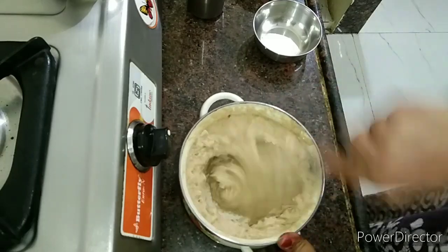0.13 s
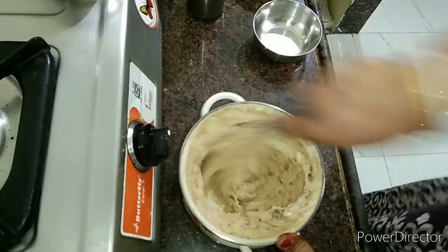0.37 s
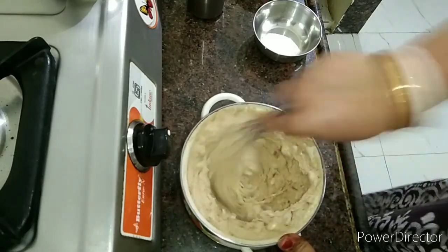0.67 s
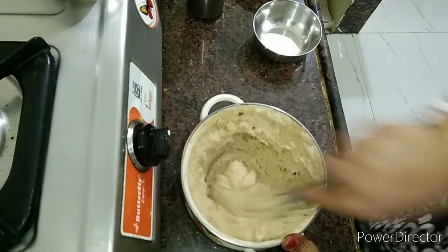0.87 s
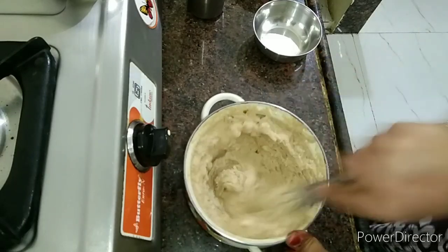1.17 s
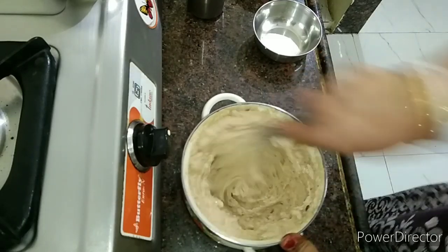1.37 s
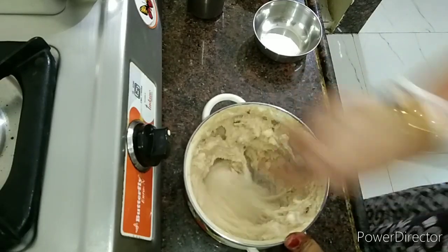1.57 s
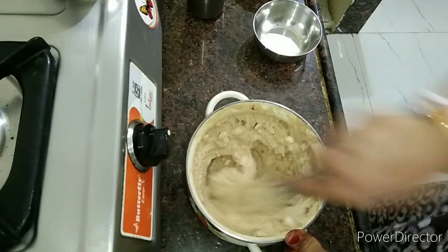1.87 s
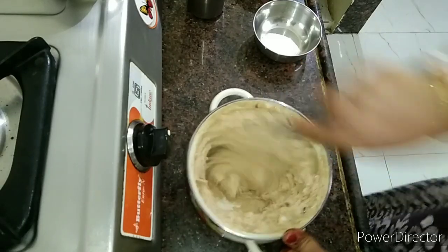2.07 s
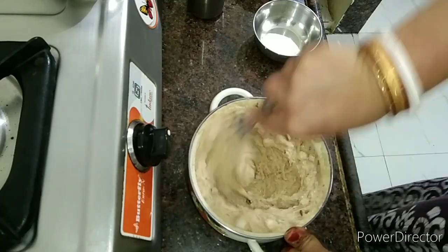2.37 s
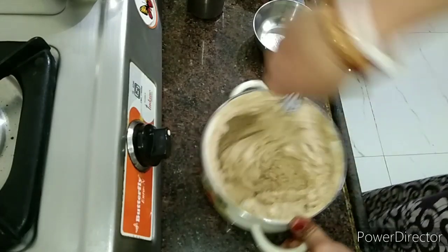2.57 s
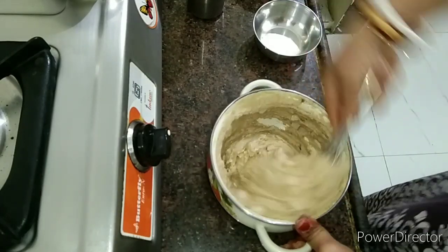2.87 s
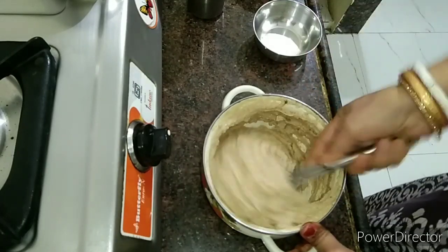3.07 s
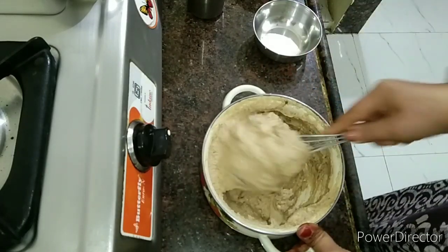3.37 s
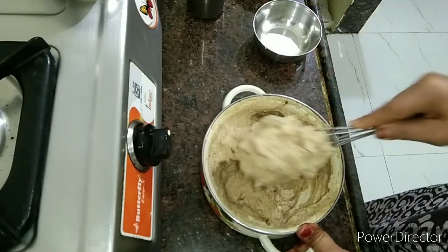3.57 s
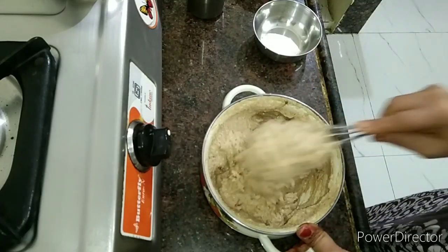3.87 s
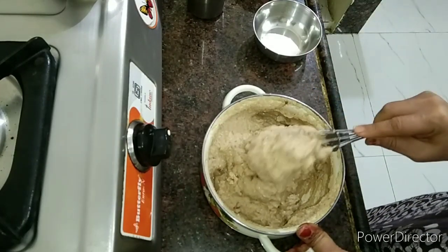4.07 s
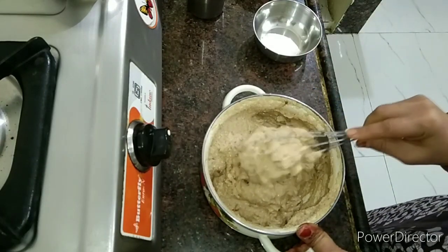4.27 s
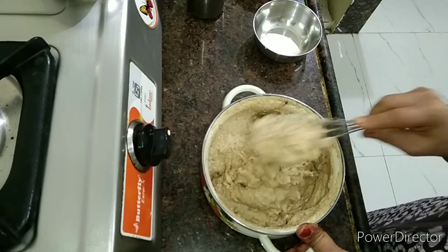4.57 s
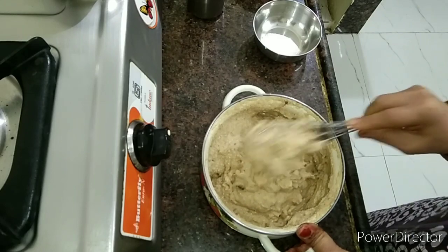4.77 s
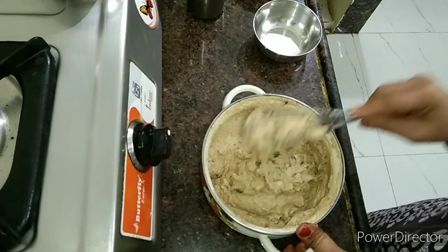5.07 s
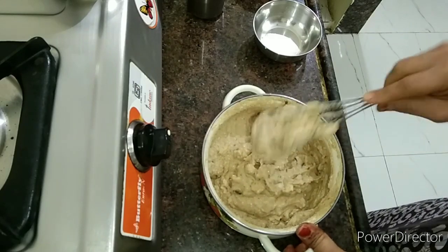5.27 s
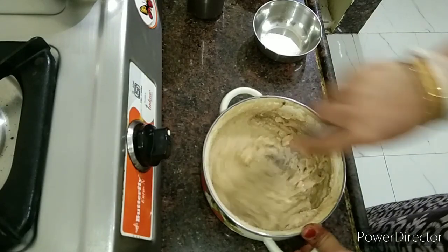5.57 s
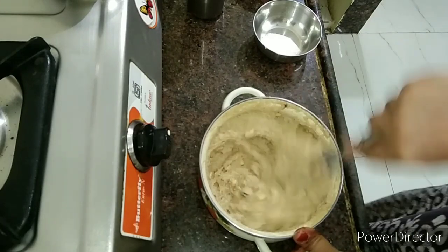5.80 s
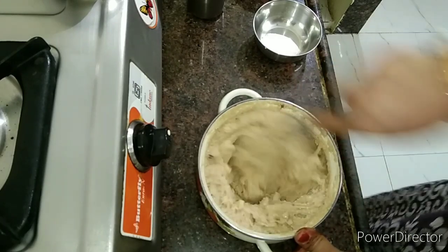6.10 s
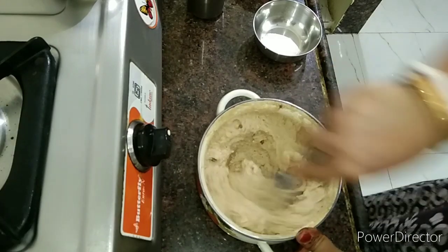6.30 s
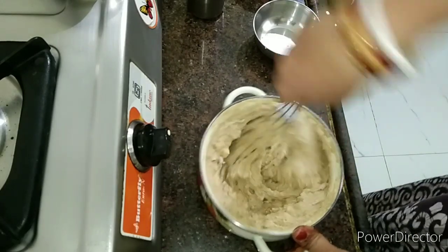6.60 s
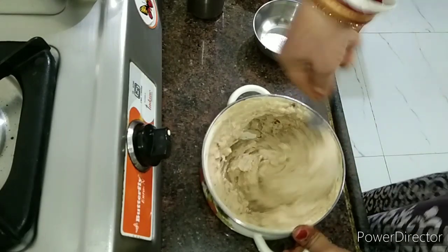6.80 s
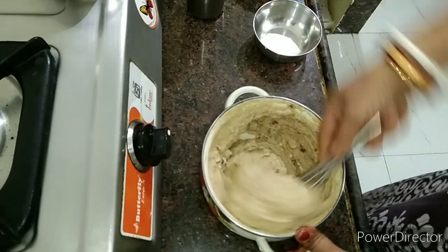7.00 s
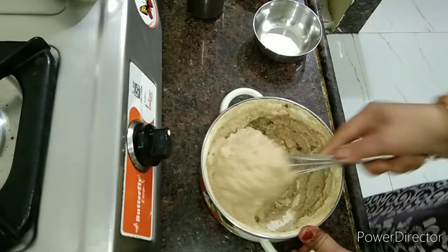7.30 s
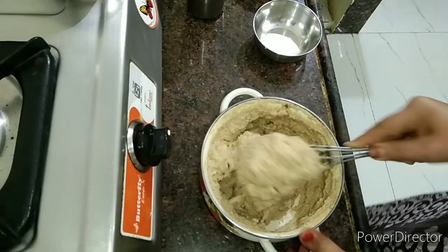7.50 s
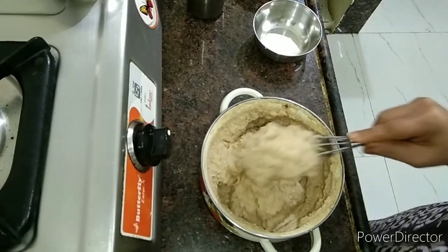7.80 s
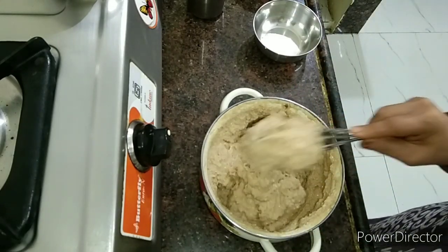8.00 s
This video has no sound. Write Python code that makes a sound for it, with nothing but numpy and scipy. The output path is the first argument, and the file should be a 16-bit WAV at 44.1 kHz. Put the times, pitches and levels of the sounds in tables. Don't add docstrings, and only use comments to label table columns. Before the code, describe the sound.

Rhythmic metallic whisk strokes clack about three times a second through sticky batter, stop, tap the rim, and resume more loosely in a hard-walled kitchen.

```python
import sys
import numpy as np
from scipy import signal
from scipy.fft import rfft, irfft
from scipy.io import wavfile
from scipy.ndimage import uniform_filter1d

SR = 44100
rng = np.random.default_rng(int(sys.argv[2]) if len(sys.argv) > 2 else 0)


def gain_from_db(level_db):
    decades = np.asarray(level_db, float) / 20
    return 10 ** decades


def store_wav(level_fs):
    pcm = np.round(np.clip(np.atleast_2d(level_fs), -1, 1) * 32767)
    wavfile.write(sys.argv[1], SR, pcm.T.astype(np.int16))


N = 359363

# start in seconds, peak in dB, ring in Hz, overtones in dB.
THUDS = [(0.046, -29, 440, -4.5), (0.365, -38.5, 440, -13), (0.372, -23.5, 440, -12),
         (0.397, -42.5, 400, -7.5), (0.418, -43.5, 385, -12), (0.453, -37.5, 403, -12),
         (0.708, -31.5, 450, -3.5), (0.718, -28, 465, -6), (0.825, -43, 350, -20), (0.852, -55, 370, -4),
         (0.806, -23.5, 390, -11), (1.054, -28.5, 472, -11), (1.298, -41.5, 449, 1), (1.376, -32, 508, -8),
         (1.471, -34.5, 410, 3.5), (1.696, -45, 413, -10), (1.717, -32, 324, -3.5),
         (2.042, -30.5, 487, -1.5), (2.093, -29.5, 430, -1), (2.127, -33.5, 386, -10.5),
         (2.524, -36, 325, -16), (2.734, -45, 293, 3), (2.923, -40.5, 292.5, -10), (2.931, -58, 292, -10),
         (3.02, -40.5, 400, 17), (1.092, -37, 382, -8), (4.609, -42.5, 483, -10), (4.8112, -37.5, 480, -10),
         (4.996, -47, 480, 2.5), (5.1615, -38.5, 485, -12), (4.847, -48.5, 320, -29),
         (5.034, -46, 311, -20), (4.65, -51.5, 308, -16), (5.2, -48, 310, -26.5), (6.068, -41.5, 400, -15),
         (1.993, -45.5, 444, -14.5), (2.164, -49.5, 380, -3), (3.215, -42, 440, 7), (4.611, -32, 270, -1.5),
         (4.812, -30.5, 274, 1), (4.996, -32.5, 270, -12), (5.162, -34.5, 256, -8.5),
         (5.377, -45.5, 281, -25), (5.985, -52.5, 304, -37.5), (6.082, -32.5, 399, -19.5),
         (6.468, -35, 486, -11.5), (6.831, -45, 388, -11), (6.996, -44.5, 935, -17),
         (0.862, -45, 400, -17.5)]
# start in seconds, peak in dB, treble in dB, low ring in dB, echo in dB.
BLOWS = [(0.1079, -11, -15, -10, -3), (0.1131, -7.5, -10, -10, -1.5), (0.438, -13.5, -13.5, -9, 9),
         (0.448, -9.5, -20, -8, -12), (0.4568, -16, -22, -33, -2), (0.7742, -17.5, -16, -3, -3),
         (0.7887, -14.5, -14.5, -4.5, -1.5), (1.1004, -11, -4.5, -5, -3), (1.4421, -16.5, -6, -4.5, -0.5),
         (1.459, -10.5, -18, -13, -4.5), (1.7823, -12.5, -10, -18.5, -0.5), (2.116, -11, -31, -7.5, -11),
         (2.1249, -10.5, -13.5, -6, 2), (2.4344, -17.5, -17, -10.5, -0.8),
         (2.4635, -17.5, -19.5, -8.5, 1.5), (4.6113, -11, -19.5, -10, 1), (4.8118, -6.5, -29, -13, -2),
         (4.9946, -22, -20, 2, -1), (5.1621, -12, -28.5, -11, 2), (6.1283, -5.5, -10, -9.5, 0.5),
         (6.5061, -6, -6.5, -4, -1), (6.517, -10.5, -9, -16, -7), (7.6544, -34, -19.5, 1.5, 4),
         (7.8007, -42.5, -21, 9, -1), (0.1135, -19, -12.5, -7, -3), (1.444, -19, -18, -8, 2),
         (0.7924, -17, -17, -1.5, -4.5), (0.797, -22, -17, -3.5, -4)]
RIM_TAPS_S = (4.5, 5.3)


def level(x, db):
    return x * gain_from_db(db) / np.sqrt(np.mean(x ** 2))


def on_log(hz, table):
    rows = np.array(table)
    return np.interp(np.log(np.maximum(hz, 1)), np.log(rows[:, 0]), rows[:, 1])


def band(x, lo_hz, hi_hz):
    edges_hz = [lo_hz, min(hi_hz, .48 * SR)]
    return signal.sosfilt(signal.butter(2, edges_hz, "bandpass", fs=SR, output="sos"), x)


def walk(rate_hz):
    hold = int(SR / rate_hz)
    steps = np.repeat(rng.standard_normal(N // hold + 1), hold)
    return 1.2 * uniform_filter1d(uniform_filter1d(steps, hold), hold)[:N]


def grains(rate_per_s, spread_db):
    hit = rng.random(N) < rate_per_s / SR
    return hit * rng.standard_normal(N) * gain_from_db(spread_db * np.minimum(rng.exponential(size=N), 4))


def causal(db):
    c = irfft(db * np.log(10) / 20)
    half = len(c) // 2
    return irfft(np.exp(rfft(np.r_[c[0], 2 * c[1:half], np.zeros(half)])))[:half]


def strike(out, s, db, hz, gain, t60, rise_s, lag_s, sag=0):
    sag_s = 0.0064
    length_s = min(.2, np.max(t60) + np.max(lag_s))
    t = np.maximum(np.arange(int(length_s * SR))[:, None] / SR - lag_s, 0)
    bent_t = t + sag * sag_s * (1 - np.exp(-t / sag_s))
    envelope = (1 - np.exp(-t / rise_s)) * 1000. ** (-t / t60)
    ring = (gain * np.sin(2 * np.pi * hz * bent_t) * envelope).sum(axis=1)
    start = int(s * SR)
    ring = ring[:N - start]
    out[start:start + len(ring)] += ring * gain_from_db(db) / np.abs(ring).max()


def with_swell(base_db, hits, after_db):
    rise_s, fall_s = 0.012, 0.056
    t = np.arange(N // 64 + 1) * 64 / SR
    late = np.maximum(t[:, None] - np.array([row[0] for row in hits]), 0)
    shape = (1 - np.exp(-late / rise_s)) * np.exp(-late / fall_s)
    peaks = gain_from_db(np.array([row[1] for row in hits]) + after_db)
    swell = np.interp(np.arange(N) / SR, t, shape @ peaks)
    return 10 * np.log10(gain_from_db(2 * base_db) + swell ** 2)


def fan():
    # time in seconds, overall level in dB.
    fan_level = [
        (0.0, -54),
        (1.11, -54),
        (1.52, -56),
        (1.86, -53),
        (4.2, -56),
        (4.74, -55),
        (5.1, -54),
        (7.72, -58),
        (7.88, -56),
        (8.15, -57),
    ]
    # multiple of the shaft rate, level in dB.
    orders = [(3, -5.5), (5, -6.5), (9, -29), (14, -26.5)]
    # frequency in Hz, air noise density in dB per Hz.
    air_spectrum = [(15, -30), (25, -14), (42, -30.5), (66, -14), (90, -10), (130, -10), (167, -14.5),
                    (251, -9), (275, -21.5), (379, -22), (945, -51.5), (1400, -46), (1800, -30.5),
                    (2340, -83.5), (3960, -120)]
    shaft_hz, bearing_hz, bearing_width_hz = 24.5, 2076, 230
    db = np.interp(np.arange(N) / SR, *np.transpose(fan_level))
    turn = 2 * np.pi * np.cumsum(shaft_hz * (1 + 0.006 * walk(3))) / SR
    tones = sum(np.sqrt(2) * gain_from_db(g_db + 0.5 * walk(8.0)) * np.sin(k * turn) for k, g_db in orders)
    air_db = on_log(np.fft.rfftfreq(N, 1 / SR), air_spectrum)
    air = irfft(rfft(rng.standard_normal(N)) * gain_from_db(air_db), N)
    hiss = band(rng.standard_normal(N), bearing_hz - bearing_width_hz / 2, bearing_hz + bearing_width_hz / 2)
    return gain_from_db(db) * (tones + level(air, -5.5) * gain_from_db(0.51 * walk(28.0)) + level(hiss, -14.5))


def kitchen(x):
    # band centre in Hz, t60 in seconds, level in dB.
    room_bands = [(162, 0.66, 12.5), (292, 0.71, 6), (607, 0.79, 4), (1383, 0.61, 7.5), (2220, 0.38, 5.5),
                  (3150, 0.16, -4.5), (4806, 0.56, 3), (7280, 0.56, 1), (10930, 0.48, 0), (16100, 0.48, -3)]
    band_ratio = 1.35
    t = np.arange(int(.9 * SR)) / SR
    clumps = np.repeat(rng.standard_normal(len(t) // 40 + 1), 40)[:len(t)]
    sparse = rng.standard_normal(len(t)) * gain_from_db(0.71 * np.exp(-t / 0.098) * clumps)
    tail = sum(gain_from_db(db) * band(sparse, hz / band_ratio, hz * band_ratio) * 1000. ** (-t / t60)
               for hz, t60, db in room_bands)
    tail = tail * np.clip((t - .003) / 0.0055, 0, 1)
    return signal.fftconvolve(x, tail / np.sqrt(len(t) * 0.058))[:N]


def pops(smack_db):
    # start in seconds, peak in dB, pitch in Hz.
    clear = [(0.108, -39.5, 1554), (0.799, -25, 3450), (0.716, -40, 3380), (2.512, -39, 3050),
             (2.542, -41, 1466), (2.923, -39.5, 749), (2.931, -41, 790), (2.043, -32, 3120),
             (2.043, -35.5, 1853), (2.27, -42.5, 1410), (2.268, -39, 3770), (5.518, -56, 3220),
             (5.519, -55.5, 2800), (5.745, -48.5, 5100), (5.766, -47, 4170), (6.774, -48, 1850),
             (6.996, -49, 2920), (7.006, -45, 3720), (2.693, -40, 3900), (2.694, -48, 3030),
             (2.595, -42, 3473), (7.253, -50, 5240), (0.716, -39, 1049), (0.738, -43, 1075),
             (0.805, -32.5, 2010), (6.553, -39, 1256), (6.57, -36, 2900), (6.773, -46, 1420),
             (6.908, -46.5, 1376), (6.947, -51, 3250), (6.955, -44, 3280), (6.963, -46, 3275),
             (1.717, -46, 1780), (6.87, -47.5, 4920), (6.91, -45, 5300), (7.105, -44, 1390),
             (3.557, -50, 5100), (3.79, -52, 5100), (4.3, -50, 6000), (3.888, -56, 4330),
             (3.423, -50, 11300), (3.48, -50, 9600), (3.663, -60, 10400), (4.478, -51.5, 10800),
             (0.801, -30, 2660), (0.802, -34, 4200)]
    out, faint = np.zeros(N), rng.random((400, 3))
    cycles = 26
    for s, db, hz in clear:
        strike(out, s, db, np.array([hz]), 1, cycles / hz, .001, 0)
    for when, pitch, size in faint:
        s, hz = when * (N - 2) / SR, 700 * 5.0 ** pitch
        db = smack_db[int(s * SR)] + 10.0 - 9 * size
        strike(out, s, db, np.array([hz]), 1, cycles / hz, .001, 0)
    return out


def drag(smack_db, scrape_db, grit_db, rumble_db):
    flicker_db = 1.8
    smack = level(band(grains(1800, 1.8), 504, 3300), 0) * gain_from_db(smack_db + flicker_db * walk(17))
    ticks = grains(4000, flicker_db)
    wires = band(band(ticks, 2300, 12000), 4730, 9000) + gain_from_db(-31.5) * band(ticks, 9000, 15500)
    scrape = level(wires, 0) * gain_from_db(scrape_db + flicker_db * walk(21))
    coarse = band(band(grains(440, 2.5), 2700, 9500), 2700, 9500)
    grit = level(coarse, -10.5) * gain_from_db(grit_db + 5.3 * walk(6.1))
    rumble = level(band(grains(900, 0.98), 200, 573), 0) * gain_from_db(rumble_db + flicker_db * walk(23))
    return gain_from_db(-4) * smack + gain_from_db(-8.5) * (scrape + grit) + gain_from_db(-4) * rumble


def sweeps():
    # start in seconds, level in dB.
    brushes = [
        (5.742, -60),
        (5.9, -63),
        (6.3, -59.5),
        (6.66, -60),
        (6.86, -55),
        (6.94, -57.5),
        (7.05, -77),
    ]
    # start in seconds, level in dB.
    drags = [
        (2.62, -64),
        (2.8, -75),
        (3.0, -66),
        (6.865, -57),
        (6.93, -57.5),
        (7.0, -77),
    ]
    brush = band(grains(9000, 1.1), 2600, 15000)
    rasp = level(band(grains(1500, 2.03), 4300, 5800), 0) * gain_from_db(with_swell(-120., drags, 0.) + 2.2 * walk(58))
    return level(brush, 0) * gain_from_db(with_swell(-120., brushes, 1.4) + 1.5 * walk(31)) + rasp


def thuds():
    # frequency in Hz, level in dB, t60 in seconds.
    pot_modes = [(270, 1.5, 0.43), (308, -2, 0.26), (370, 2.5, 0.28), (390, -1, 0.21), (434.7, 0, 0.17),
                 (509.6, 0, 0.39)]
    body_hz, body_db, body_t60 = np.transpose(pot_modes)
    pot_db, pot_db_per_octave = -9.5, 17
    t60, rim_sag = 0.045, 0.61
    out, chance = np.zeros(N), rng.random((50, 6))
    for (s, db, ring_hz, over_db), row in zip(THUDS, chance):
        hz = np.r_[ring_hz * np.array([1, .74, 1.3, 1.75]), 900 * 2.5 ** row]
        gain = gain_from_db(np.r_[0, -12, -10, over_db - 1.5, np.full(6, over_db - 5.)])
        on_rim = RIM_TAPS_S[0] < s < RIM_TAPS_S[1]
        strike(out, s, db, hz, gain, t60 * (400 / hz) ** 1.1, .0012, .0007 * (300 / hz) ** 1.39, rim_sag * on_rim)
        octaves_off = np.abs(np.log2(body_hz / ring_hz))
        near = gain_from_db(body_db - pot_db_per_octave * octaves_off + 2.6 * row)
        strike(out, s, db + pot_db, body_hz, near * np.sign(row[::-1] - .5), body_t60, .006, 0)
    return band(out, 100, 3100)


def contacts():
    # start in seconds, peak in dB, body in dB, low ring in dB, echo in dB.
    knocks = [(0.048, -29.5, 3.5, 3.5, 5), (0.3792, -28, 10, 16, -2), (0.718, -32, 3, -6, 5.5),
              (0.806, -20.5, -3.5, -1, -15.5), (1.0564, -24.5, 3, -7.5, 2.5),
              (1.125, -26, -14.5, -5.5, -2.5), (1.3704, -34, -12.5, 2, 4), (1.387, -25.5, -11.5, -4, 7),
              (1.7702, -27, 2.5, 1, 5), (2.0442, -30, -1.5, -1, 8.5), (2.693, -36.5, 17, 15, 0),
              (2.964, -31, -4, -22, 4), (3.22, -38, 1, -21, 6.5), (3.354, -42.5, 0, 10, -1),
              (5.519, -58.5, 8, 12, 1), (5.765, -41.5, 2, 6, 1.5), (5.809, -35, -6, -1.5, 4),
              (5.91, -34.5, -17, 4, -19.5), (6.089, -26, -5.5, 4.5, 4.5), (6.106, -36, -4, 18.5, 1),
              (6.111, -37.5, 3.5, -10, 10), (6.4694, -35, 14, -13, -8.5), (6.493, -25.5, -11, -9.5, -13.5),
              (7.109, -38, 16, 5, 3)]
    # start in seconds, peak in dB, treble in dB.
    wire_ticks = [(0.373, -30, -15), (0.393, -22.5, -28), (0.711, -33, -26), (0.73, -35, -9),
                  (0.7341, -26, -24), (0.764, -27, -25.5), (1.23, -28.5, -35), (1.3982, -46, 2),
                  (1.4013, -35.5, -27), (2.055, -33.5, -29), (2.06, -29.5, -22.5), (2.3511, -28.5, -25),
                  (2.412, -43, -33), (2.429, -34, -14), (3.157, -29, -29), (4.8058, -30, -12),
                  (5.742, -45.5, -16), (5.757, -40, -14), (5.782, -36, -24.5), (5.859, -34.5, -17.5),
                  (5.87, -48.5, -24), (5.903, -37, -17), (5.931, -36.5, -20.5), (5.965, -35, -17.5),
                  (5.993, -30.5, -18), (6.098, -27, -37), (6.3437, -34.5, -31), (6.871, -40, -5),
                  (7.371, -43, -19), (0.0574, -35, -13), (1.3044, -37, -25), (1.605, -35.5, -4),
                  (1.656, -43, -13), (1.908, -40.5, -10), (6.076, -33.5, -19), (7.3092, -52.5, -16.5),
                  (7.127, -51.5, -1), (7.276, -53, -4), (7.32, -54, -0.5), (3.426, -57, -12),
                  (3.485, -58, -14), (3.665, -54, -16), (4.478, -54, -12)]
    # start in seconds, peak in dB, treble in dB, low ring in dB.
    grazes = [(5.7615, -43, -8, -14), (5.787, -43, -19, -12), (5.803, -37, -10, 1.5), (5.822, -38, -20, -2),
              (5.828, -46, -10, -9), (5.841, -52, -2, -12), (5.849, -47.5, -1, -13), (5.8715, -42, -14, 0),
              (5.881, -45, -3.5, -5), (5.92, -36, -14.5, 0), (5.937, -47, -5.5, -10),
              (5.944, -49, -16.5, -12), (5.95, -47.5, -16.5, -6.5), (5.985, -51, 5, -16),
              (5.987, -39, -23, -12), (6.007, -37, -14, -9), (6.0095, -35, -17, 5), (6.04, -45, -18, -9),
              (6.052, -42, -6, -4), (0.1053, -17, -16, -6), (2.577, -33.5, -12, 4), (2.594, -33, -14, 3),
              (2.64, -51, -14, -10), (2.716, -41, -22, -11), (2.913, -37, -26, 6), (3.003, -47, -20, -14),
              (1.074, -34, -34, 8), (1.178, -35, -22, 0), (1.247, -39, -30, 8), (1.69, -35.5, -30, 9)]
    # start in seconds, peak in dB, low ring in dB.
    bangles = [(0.985, -36, -27), (7.756, -46, -31.5), (3.419, -43.5, -61), (3.479, -47, -14),
               (3.556, -48, -4), (3.5986, -49.5, -15), (3.661, -45.5, -3.5), (3.694, -42, -4),
               (3.7668, -57, -38), (3.79, -48.5, -29), (3.8647, -51, -14), (3.889, -54, 4.5),
               (4.015, -58, -34.5), (4.063, -43, -4), (4.108, -44.5, -22), (4.17, -48, -36),
               (4.476, -42, -52), (4.592, -46, -34), (5.5849, -41, -9.5), (5.705, -42.5, -28),
               (7.1849, -43.5, -4), (7.242, -41.5, 1.5), (7.399, -45, -19), (7.496, -45, -8),
               (5.598, -57, -8), (5.647, -53, -6), (5.668, -48, -30), (5.535, -49, -13), (4.755, -42, -30),
               (5.082, -42, -17), (1.355, -45, -20)]
    tick_low_db, tick_body_db, tick_echo_db = -7.5, -12, 0.5
    return ([(s, db, top, low, low - 11.5, echo) for s, db, top, low, echo in BLOWS]
            + [(s, db, -20, low, body, echo) for s, db, body, low, echo in knocks]
            + [(s, db, top, tick_low_db, tick_body_db, tick_echo_db) for s, db, top in wire_ticks]
            + [(s, db, top, low, tick_body_db + low, -2) for s, db, top, low in grazes]
            + [(s, db, -31, low, -15.5, 4.5) for s, db, low in bangles])


def clacks():
    # frequency in Hz, common colour in dB.
    clack_tone = [(300, -37), (600, -13.5), (1000, -10), (2000, -5.5), (2800, -4), (4100, -5), (5500, -6.5),
                  (7300, -0.5), (9000, -6), (11500, 0), (15000, -5.5)]
    # centre in Hz, width in Hz, level in dB.
    rim_rings = [(4250, 310, 4), (5810, 170, -1.5), (7440, 480, 1)]
    near, walls, chance = np.zeros(N + SR), np.zeros(N + SR), rng.standard_normal((160, 512))
    hz, t = np.fft.rfftfreq(512, 1 / SR), np.arange(512) / SR
    crack, chatter = 1000. ** (-t / .004), 1000. ** (-t / 0.042)
    rise = 1 - np.exp(-t / 0.00015)
    for (s, db, treble_db, low_db, body_db, echo_db), noise in zip(contacts(), chance):
        tilt = [(2000, body_db), (3100, 0.51 * body_db + 0.82 * low_db), (4100, low_db), (4900, low_db),
                (5700, 0.18 * low_db), (7000, 0.3), (9200, 7.0 + 0.49 * treble_db), (11500, treble_db)]
        tone_db = on_log(hz, clack_tone) + on_log(hz, tilt)
        uneven = np.repeat(noise[::-16], 9)[:len(hz)]
        click = causal(tone_db + 1.1 * uneven)
        on_rim = RIM_TAPS_S[0] < s < RIM_TAPS_S[1]
        fade = rise * (crack ** .65 if on_rim else crack + gain_from_db(-10.5) * chatter)
        rattle = np.convolve(noise * fade, causal(tone_db + (0 if on_rim else 2.2) * uneven))
        if on_rim:
            rattle = rattle + sum(gain_from_db(g_db) * band(rattle, f - w / 2, f + w / 2) for f, w, g_db in rim_rings)
        rattle = rattle * gain_from_db(db) / np.abs(rattle).max()
        start = int(s * SR)
        near[start:start + len(rattle)] += rattle
        same_energy = np.sqrt(np.sum(rattle ** 2) / np.sum(click ** 2))
        walls[start:start + len(click)] += click * gain_from_db(echo_db) * same_energy
    return near[:N], walls[:N]


def scene():
    # time in seconds, effort in dB.
    pull = [(0, 1.8), (0.95, 0), (1.82, 0.5), (2.34, -2.5), (2.63, -1.7), (2.79, -0.5), (3.12, -0.5),
            (3.43, -12.5), (3.9, -28), (4.54, -25), (4.68, -27), (5.2, -17.5), (5.45, -35), (5.79, -18),
            (6.28, -2), (7.08, -0.6), (7.5, -8), (7.62, -22), (8.15, -16)]
    # centre in Hz, width in Hz, level in dB.
    wire_rings = [(4460, 90, -5.5), (5730, 66, -1.5), (6920, 110, -1.5), (7900, 130, -6), (8850, 120, -10),
                  (5380, 100, -2.5), (6200, 50, -4), (6570, 60, -0.4), (7430, 65, 0), (7830, 200, -3.5)]
    effort = np.interp(np.arange(N) / SR, *np.transpose(pull))
    grit_db = -50.5 + 2.3 * effort
    smack_db = with_swell(-58 + effort, BLOWS, -45.5)
    scrape_db = with_swell(grit_db, BLOWS, -23)
    rumble_db = with_swell(-60 + 0.31 * effort, THUDS, -16)
    clack, clack_spread = clacks()
    thud, pop = thuds(), pops(smack_db)
    stir = drag(smack_db, scrape_db, grit_db, rumble_db) + sweeps()
    clack_spread = clack_spread + sum(gain_from_db(db) * band(clack_spread, hz - w / 2, hz + w / 2)
                                      for hz, w, db in wire_rings)
    room = kitchen(gain_from_db(3.5) * clack_spread + gain_from_db(-8.5) * thud + pop / 2 + gain_from_db(-1) * stir)
    return (clack + thud + pop + gain_from_db(4.5) * stir + room + fan())[None]


def roll_off(x):
    return signal.sosfilt(signal.butter(12, 16650, fs=SR, output="sos"), x)


def record(dry):
    # frequency in Hz, suppressor threshold in dB.
    mute = [(100, -110), (600, -99.5), (900, -87.5), (1300, -85.5), (1700, -88), (2100, -88), (2800, -91),
            (5000, -81), (9000, -85), (12500, -87.5), (15000, -99)]
    dip_hz, dip_width_hz, share = 2720, 450, 0.5
    port = dry[0] - share * signal.lfilter(*signal.iirpeak(dip_hz, dip_hz / dip_width_hz, SR), dry[0])
    heard = port + level(band(rng.standard_normal(N), 2000, 9000), -79.5)
    hz, _, z = signal.stft(heard, SR, nperseg=512)
    power = uniform_filter1d(np.abs(z) ** 2, size=3, axis=0) + 1e-18
    hold = .8
    power = signal.lfilter([1 - hold], [1, -hold], power, axis=1)
    pairs = np.repeat(rng.standard_normal((len(hz) // 2 + 1, z.shape[1])), 2, axis=0)[:len(hz)]
    waver = uniform_filter1d(pairs, size=25, axis=1)
    ratio = power / gain_from_db(2 * (on_log(hz, mute)[:, None] + 28 * waver))
    gain = ratio ** 2.5003 / (1 + ratio ** 2.5008) + gain_from_db(-26.0)
    x = signal.istft(z * gain, SR)[1][:N]
    x = signal.sosfilt(signal.ellip(8, .2, 48, 15350, fs=SR, output="sos"), x)
    x = x + gain_from_db(-87.5) * band(rng.standard_normal(N), 100, 16400)
    return roll_off(x[None])


dry = scene()
out = record(dry)
store_wav(out)
```